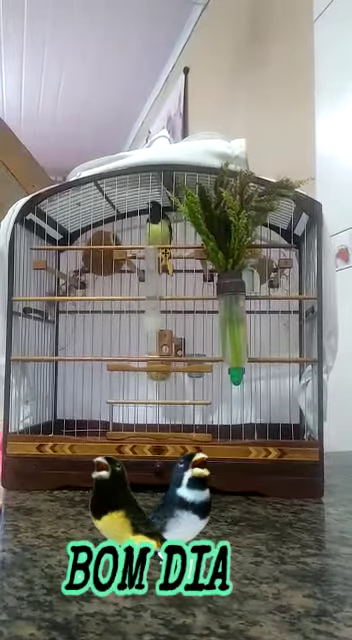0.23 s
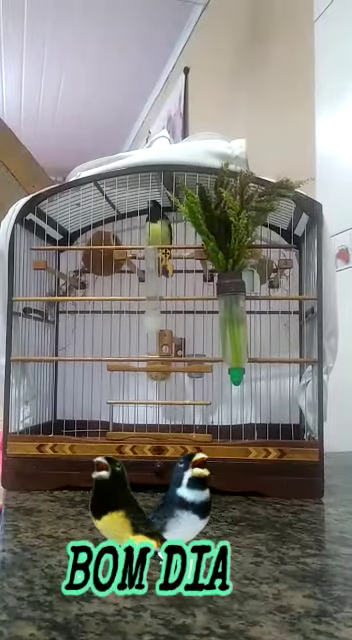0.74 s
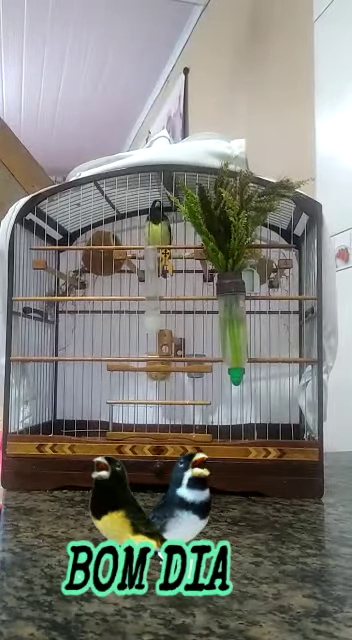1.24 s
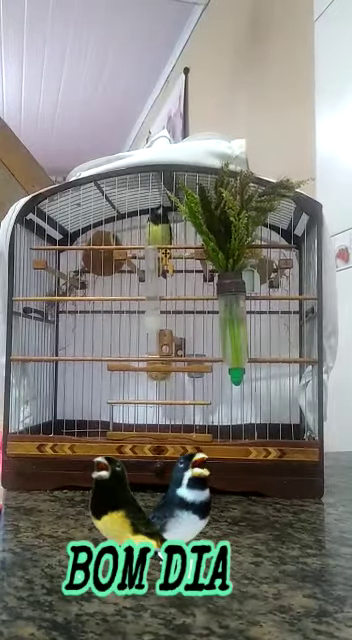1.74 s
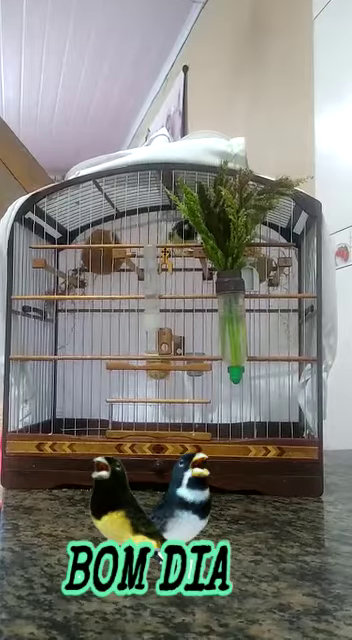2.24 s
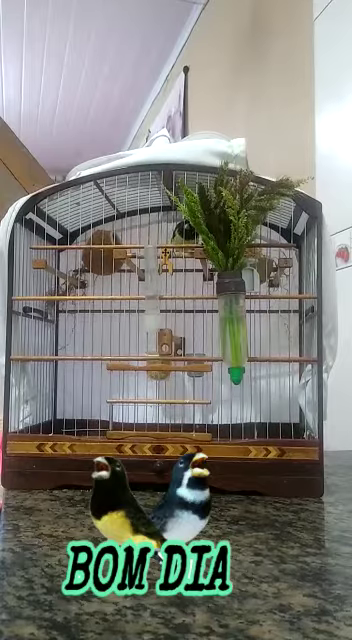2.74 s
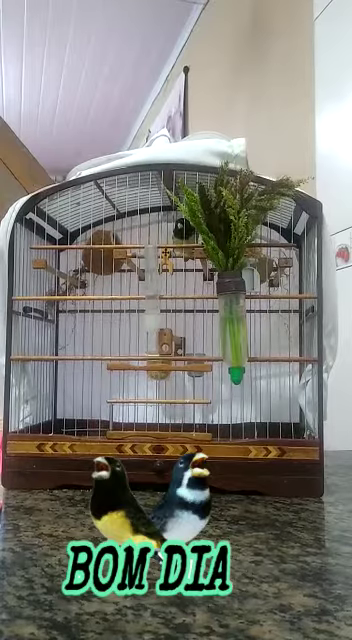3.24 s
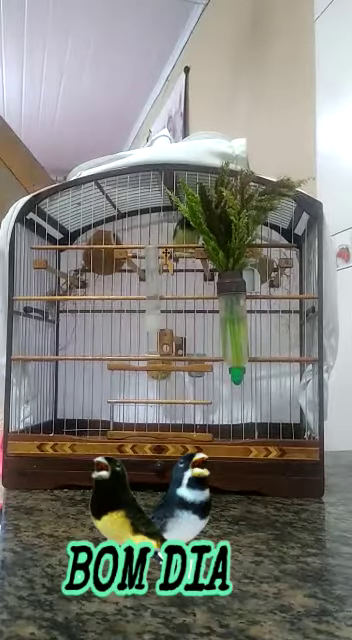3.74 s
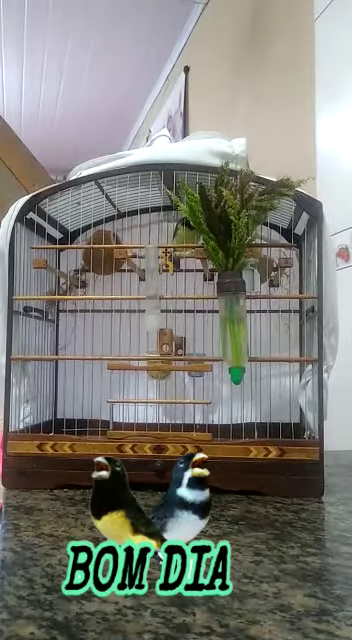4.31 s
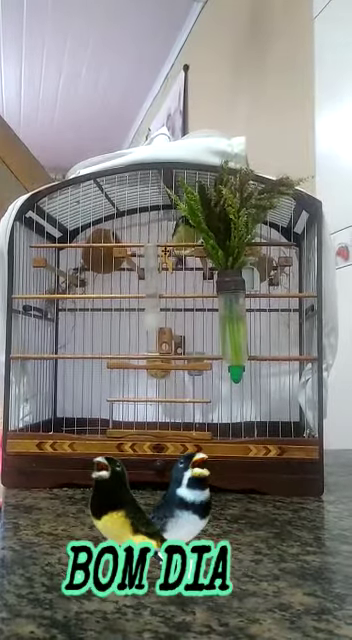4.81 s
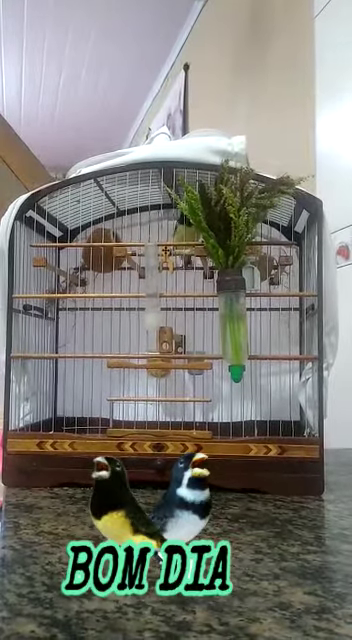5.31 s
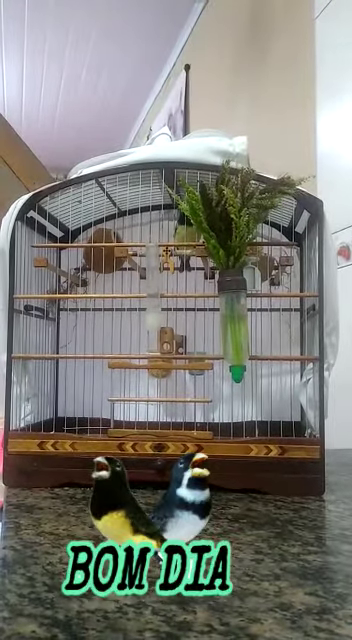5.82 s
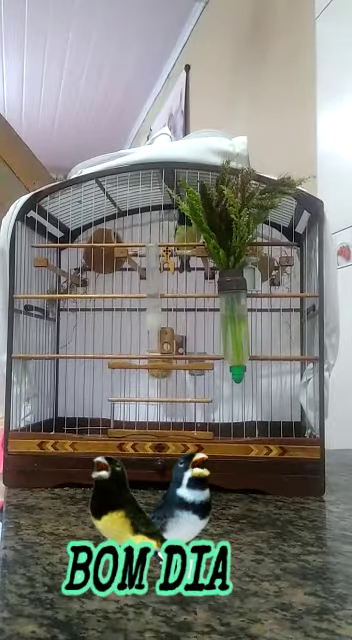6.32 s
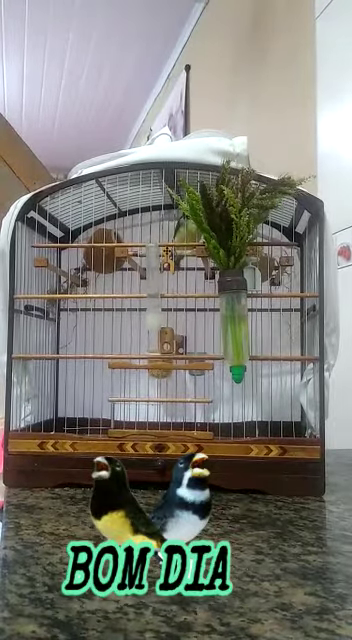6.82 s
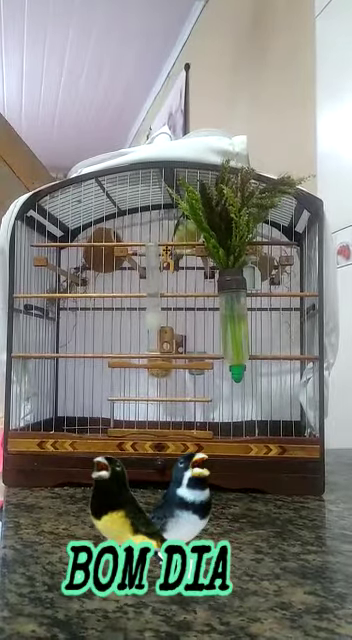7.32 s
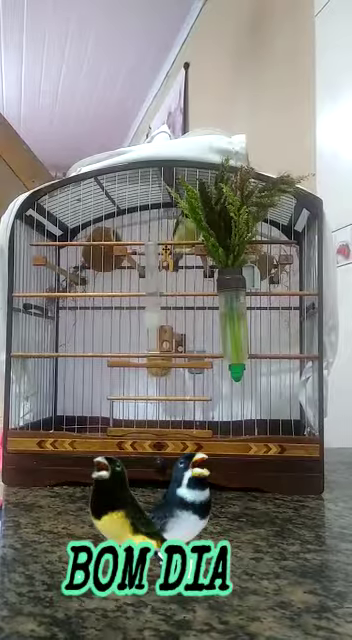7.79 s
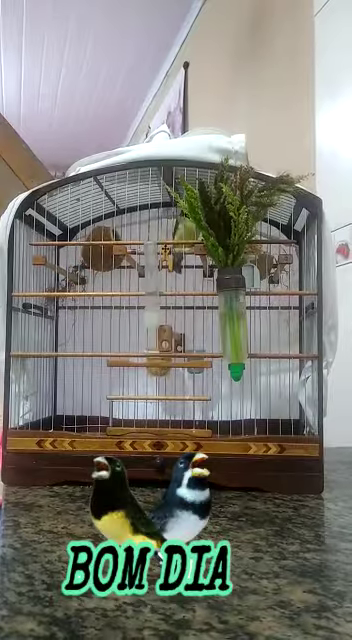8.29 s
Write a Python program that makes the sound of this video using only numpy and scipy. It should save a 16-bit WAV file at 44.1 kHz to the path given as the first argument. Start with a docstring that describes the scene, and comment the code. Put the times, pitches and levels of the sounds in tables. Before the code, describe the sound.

Close whistles and quick chirps from a small caged bird, with fainter birds twittering and calling between its phrases in a quiet home.

```python
"""A small caged songbird sings gliding whistles and whips close to two microphones in a quiet home.
Other birds answer from further off with low glides, warbles and twitter; an appliance hums over a
soft rumble. Each note is a near sine from the syrinx, roughened by turbulent air. Scratchy hiss makes
the breath around the song and blurred far twitter in between. The room smears each whistle, and a
noise suppressor lets the background rise while birds sing."""
import sys
import numpy as np
from scipy import signal
from scipy.io import wavfile
from scipy.ndimage import uniform_filter1d

SR = 44100
rng = np.random.default_rng(int(sys.argv[2]) if len(sys.argv) > 2 else 0)


def pcm_store(signal):
    """Save signal as 16-bit PCM."""
    levels = np.round(np.clip(np.atleast_2d(signal), -1, 1) * 32767)
    wavfile.write(sys.argv[1], SR, levels.astype(np.int16).T)


N = 377055
LAG = 8  # samples by which the right microphone hears late
U = np.linspace(0, 1, 41)  # share of a note's length

# The caged bird's rising whistles. Each row: start, time to the kink and length in seconds,
# low, kink and top pitch in Hz, level in dB.
RISES = [(0.214, 0.09054, 0.2165, 2800, 4087, 4552, -26.5),
         (0.443, 0.0888, 0.1876, 2923, 3968, 4330, -24.5), (0.684, 0.088, 0.1474, 2720, 3975, 4452, -25),
         (7.749, .09, 0.2162, 2814, 3929, 4479, -26), (7.979, 0.0949, 0.183, 2702, 3925, 4388, -28)]


def rising_whistle(start, kink, length, low_hz, kink_hz, top_hz, db, ease_s=.06):
    """The caged bird's pitch steepens up to a kink, then eases to the top."""
    # Level in dB at the start, halfway to the kink, just before and after it, on the ease,
    # at the top, after it and at the end.
    contour_db = (-14.5, -6.5, -8, -5, -4, 1.35, -7.5, -19)
    t, top = U * length, kink + ease_s
    climb = low_hz + (kink_hz - low_hz) * np.minimum(t / kink, 1) ** 1.7
    ease = glide(0, top_hz - kink_hz, (t - kink) / ease_s, bend=1.6)
    times = [0, kink / 2, kink - .01, kink + .01, (kink + top) / 2, top, (top + length) / 2, length]
    return contour(start, length, climb + ease, db + np.interp(t, times, contour_db))


def held_whistles():
    """The caged bird's flatter whistles settle on a pitch as they swell and fade."""
    # Each row: start and length in seconds, first and last Hz, share at which the pitch settles,
    # level in dB, share at which it is loudest, dB gained, dB lost.
    whistles = [(7.208, 0.057, 4596, 4400, .95, -47, 0.42, 11, 6.5),
                (7.26, 0.1102, 4446, 4107, 0.36, -34, 0.36, 14.5, 22),
                (7.528, 0.0914, 3443, 3570, 0.38, -35.5, 0.53, 12, 23),
                (7.574, 0.1407, 4816, 4650, .8, -29.5, 0.47, 21, 29.5)]
    return [contour(start, length, glide(first, last, U / settled, bend=1.7), db + swell(*shape))
            for start, length, first, last, settled, db, *shape in whistles]


def whips():
    """The caged bird's steep falls, each breaking into two hoarse flicks and a low tail."""
    # Each row: start and length in seconds, top and bottom Hz, slowness of the start, level in dB.
    drops = [(.9, 0.08385, 6783, 5343, 1.537, -27.5), (1.101, 0.0964, 7550, 5524, 2.01, -29),
             (8.191, .082, 6895, 5463, 1.6, -27.5), (8.39, 0.05766, 6950, 5500, 1.62, -27.5)]
    # Flicks and tail. Each row: delay after the fall and length in seconds, first and last Hz,
    # dB relative to the fall at start, middle and end.
    endings = [(-.007, .025, 4152, 5208, -14.5, 0, -4.16), (.021, 0.019, 3882, 4982, 4, -3.5, -5),
               (0.033, .047, 3625, 3178, -4, -5.5, -19)]
    falls, flicks = [], []
    for start, length, top, bottom, bend, db in drops:
        hz = glide(top, bottom, U / .82, bend)
        falls.append(contour(start, length, hz, db + swell(.68, rise_db=15, fall_db=1.5)))
        for delay, flick_s, first, last, *levels in endings:
            hz = glide(first, last, U / .65, bend=.981)
            flicks.append(contour(start + length + delay, flick_s, hz, db + arc(*levels)))
    return falls, flicks


def low_calls():
    """A second bird's low falling glides, and calls that climb and then drop."""
    # Each row: start and length in seconds, first and last Hz, level in dB, share at which it is loudest.
    falls = [(-.125, 0.2657, 2936, 2029, -27, 0.35), (2.145, .105, 3752, 1771, -36.5, .5),
             (2.984, 0.33, 2877, 2048, -28.5, 0.44)]
    # Each row: start and length in seconds, pitch factor, level in dB, dB added to the closing drop,
    # slowness of the climb.
    climbs = [(1.086, .265, 1.01, -22.5, 0, 1.03), (4.592, .28, .995, -31.5, -4.5, .88)]
    # The shape of every climb. Each row: share of the length, base pitch in Hz, relative level in dB.
    climb_shape = [(0, 1830, -37), (.2, 2000, -22), (.4, 2150, -14), (.53, 2420, -3), (.65, 2820, 0.52),
                   (0.772, 2870, -3.5), (.85, 2700, -12.5), (.93, 2215, 0), (1, 2150, -43)]
    share, shape_hz, shape_db = np.transpose(climb_shape)
    notes = [contour(start, length, glide(first, last, U, bend=1.2), db + swell(peak, 21, 28))
             for start, length, first, last, db, peak in falls]
    for start, length, factor, db, drop_db, slowness in climbs:
        hz = factor * np.interp(U ** slowness, share, shape_hz)
        level_db = db + np.interp(U ** slowness, share, shape_db) + drop_db * np.clip(8 * U - 6, 0, 1)
        notes.append(contour(start, length, hz, level_db))
    return notes


def warbles(warble_s=.115):
    """A third bird's rising notes open with a fast warble that dies away."""
    # Each row: start and length in seconds, Hz at start, middle and end, peak level in dB,
    # dB by which the warble lies below the peak, warble depth in Hz.
    calls = [(-.15, .18, 3340, 3680, 4120, -34.5, -12, 361), (3.65, 0.148, 4104, 4160, 4234, -55.5, 10, 3),
             (3.999, 0.1964, 3302, 4073, 4130, -48, 6, 366),
             (4.297, 0.2268, 3290, 3980, 4640, -45, 5.5, 373),
             (6.784, 0.192, 3822, 4174, 4270, -52, 8, 361.5),
             (7.134, 0.116, 3279, 3700, 3600, -49, 6.5, 356),
             (7.407, 0.2123, 3090, 4160, 4440, -45, 4, 361),
             (7.7, 0.141, 3417, 4035, 4360, -42.5, 3.5, 357.5)]
    notes = []
    for start, length, *pitches, db, under, depth_hz in calls:
        below_db = np.interp(U, [0, .335, .53, .69, 1], [under + 10, under, under, 0, 9.5])
        depth = glide(depth_hz, 0, U * length / warble_s, bend=2)
        notes.append(contour(start, length, arc(*pitches), db - below_db, depth))
    return notes


def far_twitter():
    """Short chirps of far birds, each faintest at the end further from its peak."""
    # Each row: start and length in seconds, Hz at start, middle and end, level in dB,
    # share at which it is loudest.
    chirps = [(1.459, 0.0624, 4850, 3916, 2500, -50, 0.42), (1.559, 0.07, 5260, 4390, 2320, -52, 0.71),
              (1.664, 0.0564, 4830, 4150, 3940, -50.5, 0.06), (1.685, 0.0515, 6070, 6020, 7030, -54, 0.24),
              (1.702, 0.0542, 6490, 6350, 6700, -52.5, 0.11),
              (1.807, 0.0344, 5000, 4710, 4680, -53.5, 0.64), (1.823, 0.162, 6550, 6110, 4950, -53, 0.62),
              (2.0, 0.0585, 4135, 4290, 4340, -52.5, .4), (2.046, 0.041, 5110, 5130, 5360, -52.5, 0.29),
              (2.102, 0.035, 6990, 6980, 6700, -63.5, 0.73), (2.102, 0.0535, 3680, 3690, 3340, -50.5, 0.33),
              (2.245, 0.0184, 5220, 5230, 5250, -48, 0.74), (2.259, .1, 6900, 4500, 2900, -47, 0.62),
              (2.438, 0.0525, 2417, 3070, 3460, -52.5, 0.09), (2.541, 0.051, 6560, 7100, 9400, -60, 0.3),
              (2.566, 0.033, 4780, 5170, 4570, -51.5, 0.69), (2.601, 0.0588, 6820, 6060, 4200, -46.5, 0.94),
              (2.711, .045, 5820, 6060, 6190, -51.5, 0.3), (2.73, 0.052, 6670, 7240, 6500, -51, 0.63),
              (2.777, 0.0632, 3550, 3047, 2310, -49, 0.52), (2.826, 0.0403, 5332, 5100, 4800, -59.5, 0.51),
              (3.148, 0.0507, 3820, 4000, 3500, -60, 0.4), (3.931, 0.077, 5320, 5950, 6050, -83, 0.6),
              (4.593, 0.0629, 5300, 5790, 6700, -56.5, 0.81), (4.621, 0.0465, 6500, 5640, 7500, -61.5, 0.7),
              (4.678, .07, 5910, 5520, 5370, -49.5, 0.25), (4.896, 0.049, 3960, 4470, 5950, -64.5, 0.57),
              (4.966, 0.0877, 6100, 5915, 5160, -56.5, 1)]
    return [contour(start, length, arc(*pitches), db + swell(peak, 17 * peak, 17 * (1 - peak)))
            for start, length, *pitches, db, peak in chirps]


def syrinx(rows, overtones_db, shaky, rasp, warble_hz=100):
    """One note's start and sound: a near sine with weak overtones, its pitch swung by any warble."""
    # The beak's colouring of the overtones. Each row: frequency in Hz, gain in dB.
    beak = [(5000, 12), (7600, 8), (8300, -7), (11000, -7.5), (13000, 1.5), (15500, 0.5)]
    times, hz, db, *depth = np.transpose(rows)
    t = np.arange(times[0], times[-1], 1 / SR)
    hz, db = (uniform_filter1d(np.interp(t, times, curve), 200, mode="nearest") for curve in (hz, db))
    depth = np.maximum(np.interp(t, times, depth[0]), 0) if depth else 0 * t
    beat = 2 * np.pi * warble_hz * (t - times[0] + .0012)
    swing = -np.cos(beat + .5) * .955 - .5  # each pulse sags in pitch
    phase = 2 * np.pi * np.cumsum(hz * (1 + shaky * drift(len(t), .00072)) + depth * swing) / SR
    tone = np.sin(phase)
    harsh = 1 + abs(np.gradient(hz)) * .8 * drift(len(t), .0005)  # fast sweeps fray the overtones
    # Overtones grow with effort, and with the beak wide on high notes.
    harsh *= gain_of(.4 * (db - db.max())) * (hz / 4300) ** 2
    for k, over_db in enumerate(overtones_db, 2):
        tone += gain_of(over_db + curve_at(beak, k * hz)) * harsh * np.sin(k * phase) * (k * hz < SR / 2.2)
    tone *= 1 + rasp * drift(len(t), .00012)  # turbulent air roughens the tone
    pulse_db = .004 * depth * (np.cos(beat) + .77)
    level = gain_of(db + pulse_db + 2.953 * drift(len(t), .0038))
    return times[0], np.sqrt(2) * level * tone * signal.windows.tukey(len(t), min(300 / len(t), 1))


def bird(notes, overtones_db, shaky, rasp):
    """Sings notes in one voice; overtones_db sets multiples 2, 3, .. of the pitch."""
    out = np.zeros(N)
    for rows in notes:
        add(out, *syrinx(rows, overtones_db, shaky, rasp))
    return out


def room(sound, direct_db, walls_db, tail_db):
    """Direct sound, a few near walls, then sparse echoes that die band by band."""
    # Each row: frequency in Hz, seconds to die away by 60 dB.
    decay = [(1500, .28), (3000, 0.3207), (6000, .35), (12000, 0.27)]
    taps = np.zeros((2, SR))
    echoes = np.arange(500, SR - 20, 20) + rng.integers(0, 20, (2, (SR - 501) // 20))
    np.put_along_axis(taps, echoes, rng.choice([-1., 1.], echoes.shape), 1)
    hz, t, spectrum = signal.stft(taps, SR, nperseg=256)
    path = signal.istft(spectrum * gain_of(-60 * t / curve_at(decay, hz)[:, None]), SR, nperseg=256)[1]
    path *= gain_of(tail_db) / np.linalg.norm(path[0])
    walls = np.arange(60, 900, 120) + rng.integers(0, 120, (2, 7))
    bounces = gain_of(walls_db - walls / 150) * rng.choice([-1., 1.], walls.shape)
    np.put_along_axis(path, walls, bounces, 1)
    path[0, 0] = path[1, LAG] = gain_of(direct_db)
    return signal.fftconvolve(sound[None], path, axes=1)[:, :N]


def scratch():
    """Scratchy noise in small patches of pitch and time, different at each microphone."""
    # Each row: frequency in Hz, gain in dB.
    colour = [(1500, -31.5), (2500, -6.5), (3800, 1.5), (6500, -7), (7400, -18.5), (8600, -21.5),
              (12000, -20), (15600, -32)]
    frames, hz = N // 64 + 5, np.fft.rfftfreq(256, 1 / SR)
    real, imag, patches = rng.standard_normal((3, 2, frames, 129)).transpose(0, 1, 3, 2)
    patches_db = 4.5 * unit_rms(uniform_filter1d(uniform_filter1d(patches[0], 5, 0), 30, 1))
    spectrum = (real + 1j * imag) * gain_of(curve_at(colour, hz)[:, None] + patches_db)
    return unit_rms(signal.istft(spectrum, nperseg=256, noverlap=192)[1][:, :N])


def breath(noise, song):
    """A breathy rasp that flares with the caged bird's loudness."""
    loudness = np.sqrt(abs(uniform_filter1d(song ** 2, round(.006 * SR))))
    return noise[::-1] * gain_of(-27) * loudness


def hiss_bouts(noise, onset_s=.015, fade_db_per_s=244):
    """Scratchy hiss: breathy noise around the caged bird's song, blurred far twitter in between."""
    # Each row: start and length in seconds, dB at start and end, low edge in Hz.
    bouts = [(0, 0.1594, -47, -64, 2800), (0.158, 0.069, -48.5, -47, 3600), (0.245, 0.92, -63, -56.5, 3420),
             (0.948, 0.463, -50, -50.5, 2000), (1.425, 0.275, -67.5, -58, 1990),
             (2.056, 0.33, -61, -68.5, 1980), (2.537, 0.158, -69, -56, 3070),
             (2.901, 0.186, -55.5, -53, 4266), (3.143, 0.102, -58.5, -59.5, 2755),
             (3.24, 0.113, -60.5, -48, 2820), (4.606, .11, -67, -71, 5300),
             (4.62, 0.165, -38.5, -55, 10560), (7.214, 0.114, -53, -59.5, 2484),
             (7.501, 1.7, -56, -59, 2500)]
    # Each rising whistle scratches as it kinks.
    kinks = [(start + kink - onset_s, onset_s, db - 27.5, db - 27.5, 4521) for start, kink, *_, db in RISES]
    out = np.zeros((2, N))
    for start, length, first_db, last_db, edge_hz in bouts + kinks:
        t = np.arange(0, length + .25, 1 / SR)
        db = np.interp(t, [0, length], [first_db, last_db]) - fade_db_per_s * np.maximum(t - length, 0)
        envelope = np.minimum(t / onset_s, 1) * gain_of(db)
        highpass = signal.butter(4, edge_hz, "high", fs=SR, output="sos")
        band = signal.sosfilt(highpass, noise[:, round(start * SR):][:, :len(t)])
        for channel, part in zip(out, band):
            add(channel, start, part * envelope[:len(part)])
    return out


def household_air():
    """Low household rumble fading into faint hiss, in drifting patches."""
    # Each row: frequency in Hz, relative noise density in dB.
    colour = [(40, -9), (64, -1), (85, -20.5), (105, -7.5), (137, -16.5), (170, -6.5), (250, -6.5),
              (350, -15.5), (534, -19), (974, -30), (1300, -33.5), (4000, -40.5), (9000, -68.5)]
    # Each row: frequency in Hz, left-right likeness from 0 to 1.
    likeness = [(60, 0.29), (300, .85), (700, 0.27), (1500, .5), (4000, 0.017)]
    frames, hz = N // 512 + 5, np.fft.rfftfreq(2048, 1 / SR)
    a, b, c, d, patches = rng.standard_normal((frames, 1025, 5)).T
    left, unrelated = a + 1j * b, c + 1j * d
    patches_db = 1.9 * unit_rms(uniform_filter1d(uniform_filter1d(patches, 16, 0), 6, 1))
    same = curve_at(likeness, hz)[:, None]
    delay = np.exp(-2j * np.pi * hz * LAG / SR)[:, None]
    right = delay * same * left + np.sqrt(1 - same ** 2) * unrelated
    spectrum = np.array([left, right]) * gain_of(curve_at(colour, hz)[:, None] + patches_db)
    return gain_of(-60) * unit_rms(signal.istft(spectrum, nperseg=2048, noverlap=1536)[1][:, :N])


def appliance():
    """Motor tones that waver a little in pitch and level."""
    # Each row: frequency in Hz, relative level in dB.
    tones = [(59.2, -69), (113.0, -73.5), (166.9, -78), (414.5, -82), (527.6, -85), (823.6, -95.5),
             (882.9, -99), (942.1, -95.5), (1001, -98.5)]
    out = np.zeros(N)
    for hz, db in tones:
        turns = np.cumsum(hz * (1 + .0044 * drift(N, .48))) / SR + rng.random()
        out += gain_of(db + .55 * drift(N, .18)) * np.sin(2 * np.pi * turns)
    return gain_of(10) * out


def contour(start, length, *columns):
    """One note as rows of seconds, pitch in Hz, level in dB and, if given, warble depth in Hz."""
    rows = np.transpose([start + length * U, *columns])
    return rows[rows[:, 0] >= 0]


def glide(first, last, share, bend):
    """Eases from one value to another and stays there."""
    return first + (last - first) * np.sin(np.pi / 2 * np.clip(share, 0, 1)) ** bend


def swell(peak, rise_db, fall_db):
    """Level in dB over a note, rounded at its loudest point."""
    peak = np.clip(peak, .02, .98)
    return np.where(U < peak, -rise_db * (1 - U / peak) ** 2, -fall_db * ((U - peak) / (1 - peak)) ** 2)


def arc(first, middle, last):
    """A parabola through three values."""
    return first * (1 - U) * (1 - 2 * U) + 4 * middle * U * (1 - U) + last * U * (2 * U - 1)


def drift(size, seconds):
    """Smooth random curve of rms 1."""
    width = max(int(seconds * SR), 2)
    return unit_rms(uniform_filter1d(uniform_filter1d(rng.standard_normal(size), width), width))


def gain_of(db):
    """Decibels to amplitude."""
    return 10 ** (np.asarray(db) / 20)


def unit_rms(x):
    """Scales to rms 1."""
    return x / np.sqrt(np.mean(x ** 2) + 1e-20)


def curve_at(points, hz):
    """Reads a table along log frequency."""
    points_hz, value = np.transpose(points)
    return np.interp(np.log(hz + 1), np.log(points_hz + 1), value)


def add(mix, start, sound):
    """Mixes a sound in at a start time in seconds."""
    part = mix[round(start * SR):][:len(sound)]
    part += sound[:len(part)]


def scene():
    """Each bird has its own distance, so its own share of direct sound and room."""
    whistles = [rising_whistle(*row) for row in RISES] + held_whistles()
    falls, flicks = whips()
    near = bird(whistles, overtones_db=(-29, -25, -28), shaky=.0036, rasp=.013)
    near += bird(falls, overtones_db=(-24, -30), shaky=.005, rasp=.027)
    near += bird(flicks, overtones_db=(-26, -20), shaky=.025, rasp=.03593)
    low = bird(low_calls(), overtones_db=(-52, -46, -42, -49, -41.5), shaky=.0014, rasp=.003069)
    warbler = bird(warbles(), overtones_db=(-36, -38), shaky=.0016, rasp=.004)
    far = bird(far_twitter(), overtones_db=(-20, -36), shaky=.01887, rasp=.182)
    birds = room(near, direct_db=-1.3, walls_db=-12.5, tail_db=-7)
    birds += room(warbler, direct_db=-1.1, walls_db=-23, tail_db=-11.5)
    birds += room(low, direct_db=-1.1, walls_db=-13, tail_db=-8.5)
    birds += room(far, direct_db=-5, walls_db=-11.5, tail_db=-3.06)
    noise = scratch()
    return birds + breath(noise, near) + hiss_bouts(noise) + household_air() + appliance()


def record(dry):
    """Microphone colour, a suppressor that opens with the treble level, then bass and treble cuts."""
    # The colour of each microphone. Each row: frequency in Hz, gain in dB.
    left_mic = [(100, -1.5), (7000, 7.5), (9000, 5), (11000, 7), (13500, 12), (15500, 14)]
    right_mic = [(100, -2.5), (7000, 8.5), (9000, -4), (11000, -2.5), (13500, -1.5), (15500, -0.5)]
    # The suppressor's cut. Each row: frequency in Hz, gain in dB before the opening scales it.
    cut = [(100, -12), (1000, -12), (2500, -9.5), (12000, -11.5)]
    framing = dict(fs=SR, nperseg=1024, noverlap=768)
    hz, t, spectrum = signal.stft(dry, **framing)
    spectrum *= gain_of([curve_at(left_mic, hz), curve_at(right_mic, hz)])[:, :, None]
    hiss = gain_of(-73.5) * rng.standard_normal(dry.shape)  # from the electronics
    spectrum += signal.stft(hiss, **framing)[2]
    treble_db = 10 * np.log10((abs(spectrum[:, hz > 1500]) ** 2).sum(1).mean(0) + 1e-12)
    release = np.arange(len(t)) * 3.6  # the held level falls by up to 3.6 dB a frame
    held_db = uniform_filter1d(np.maximum.accumulate(treble_db + release) - release, 5)
    closed = 1 / (1.5 + np.exp((held_db + 51.5) / 6))
    wet = signal.istft(spectrum * gain_of(curve_at(cut, hz)[:, None] * closed), **framing)[1][:, :N]
    wet = signal.sosfilt(signal.butter(6, 44, "high", fs=SR, output="sos"), wet)
    lowpass = signal.firwin(1023, 15720, window=("kaiser", 9), fs=SR)
    return signal.oaconvolve(wet, lowpass[None], "same")


dry = scene()
out = record(dry)
pcm_store(out)
```